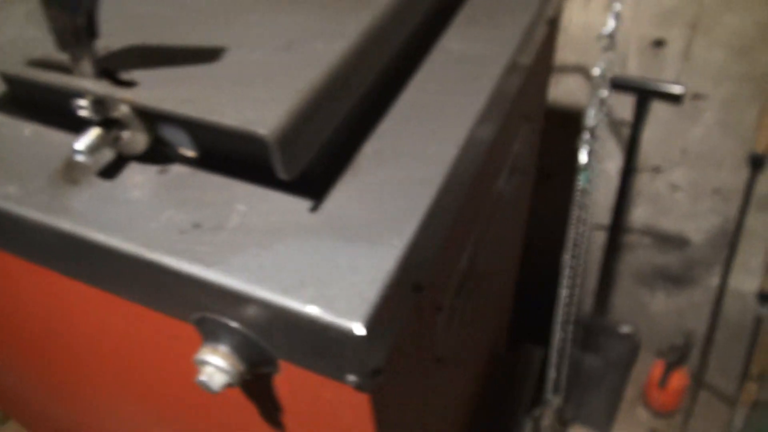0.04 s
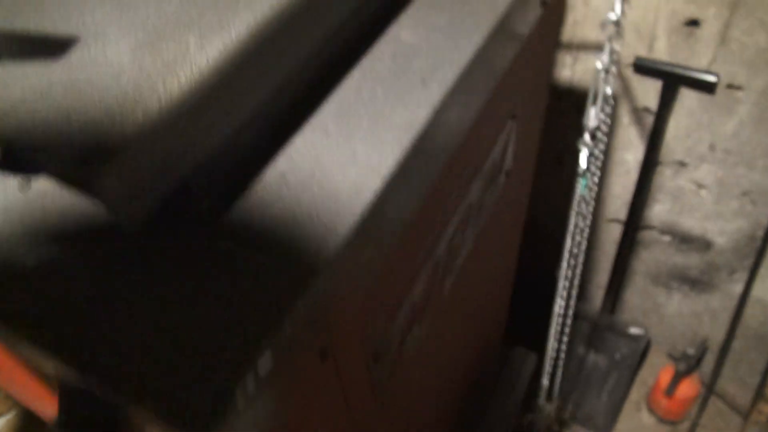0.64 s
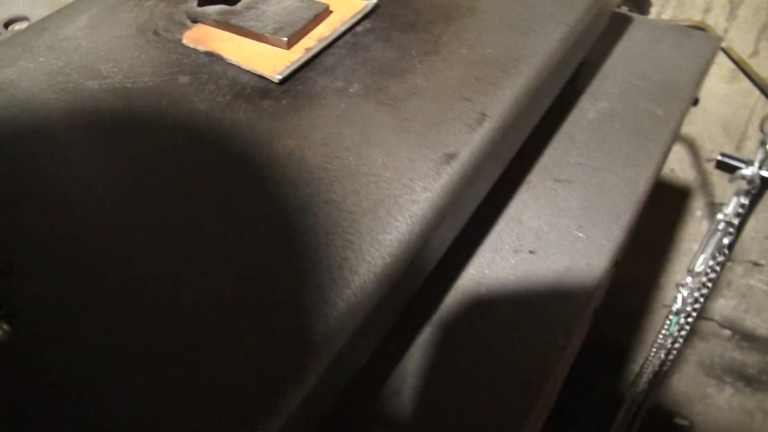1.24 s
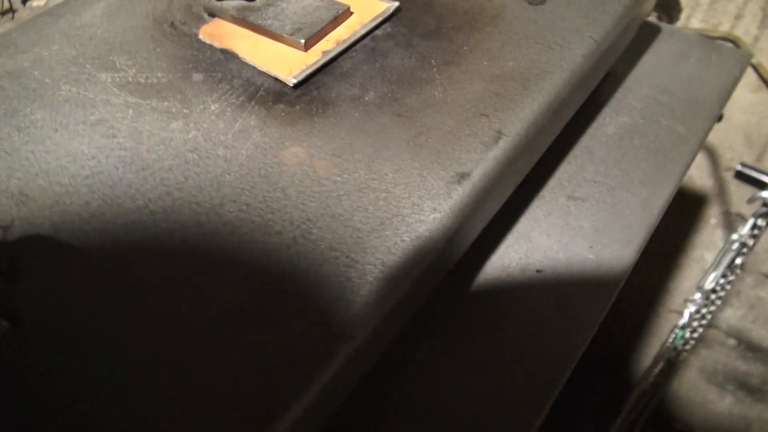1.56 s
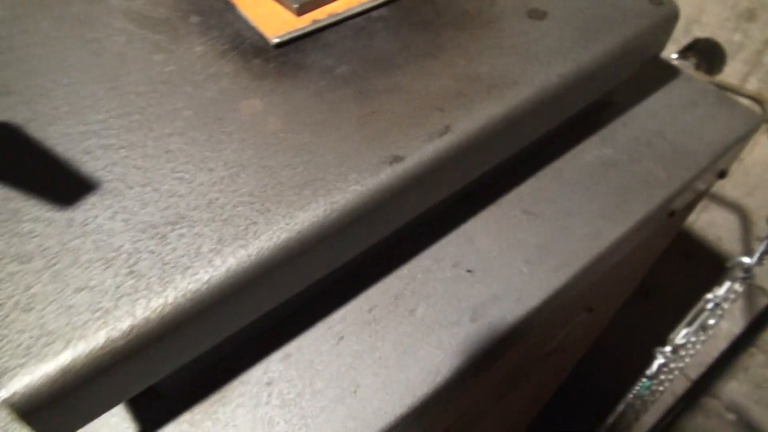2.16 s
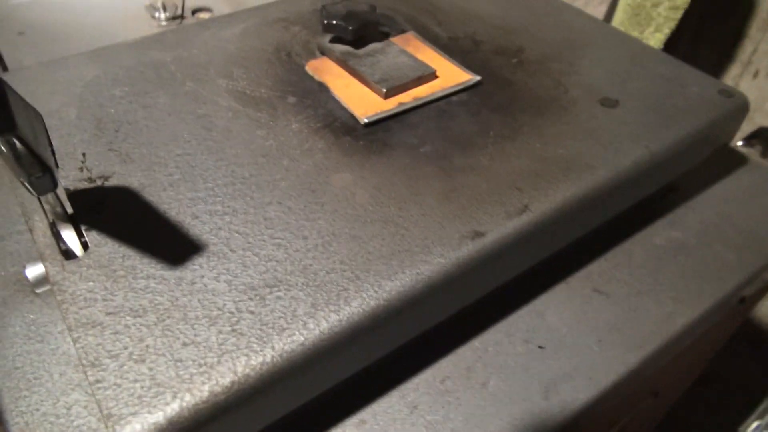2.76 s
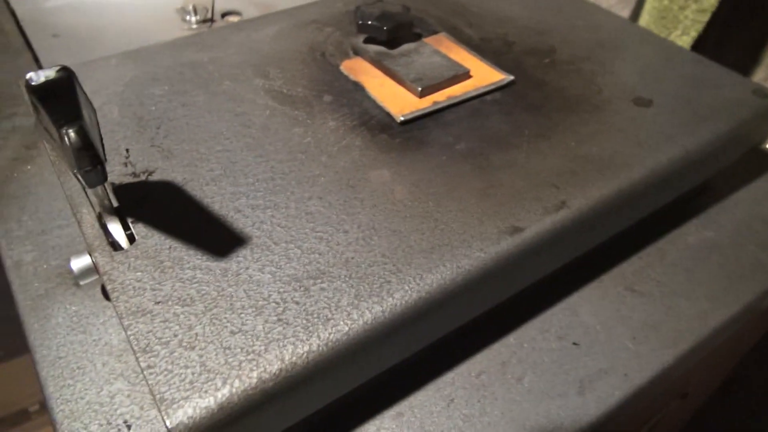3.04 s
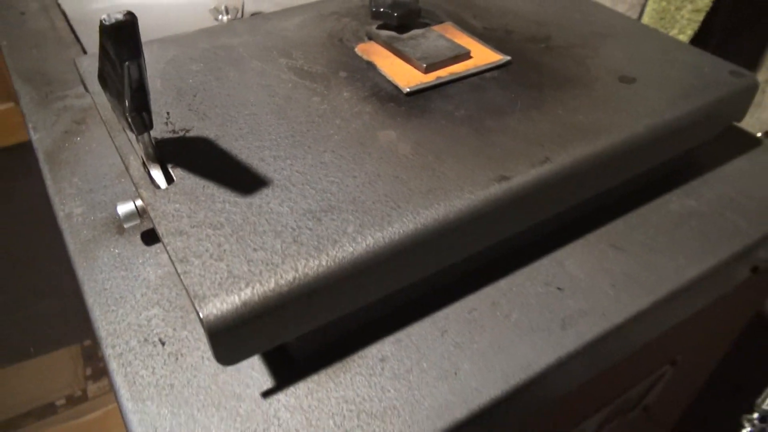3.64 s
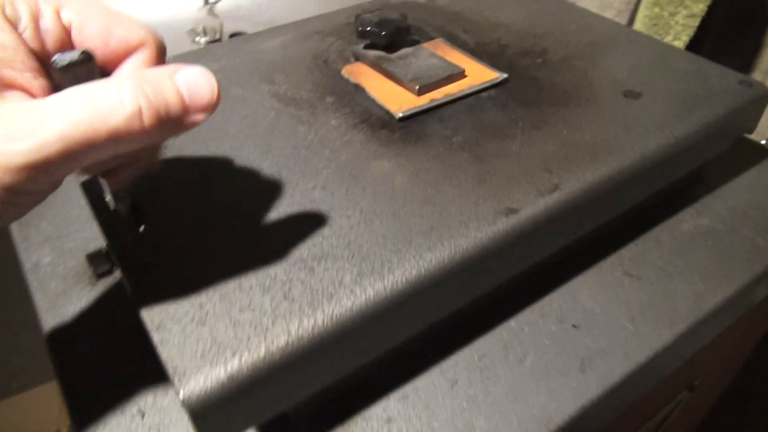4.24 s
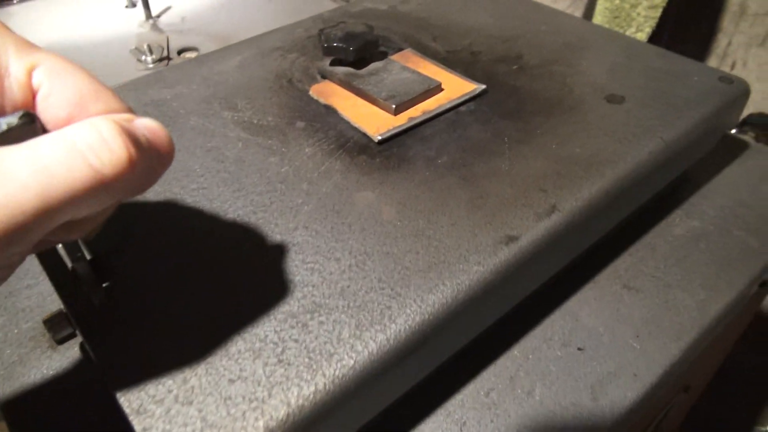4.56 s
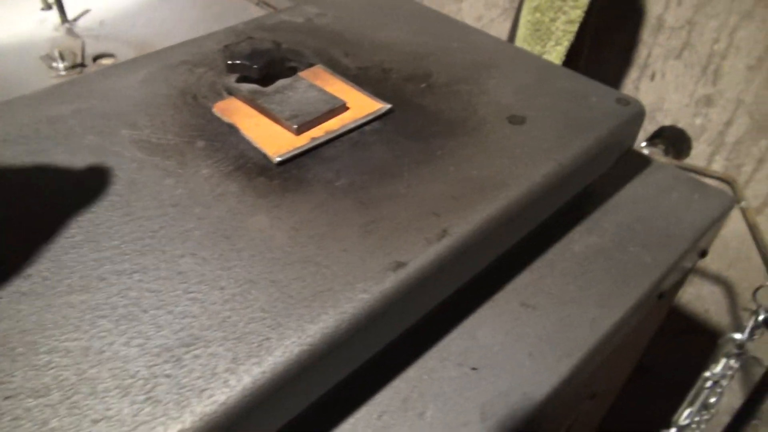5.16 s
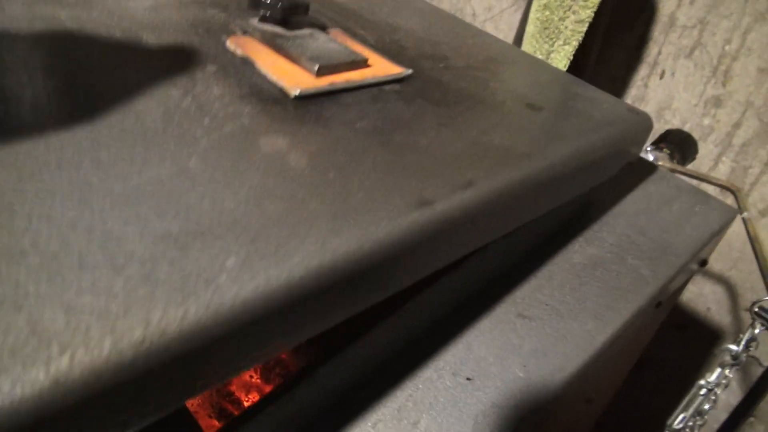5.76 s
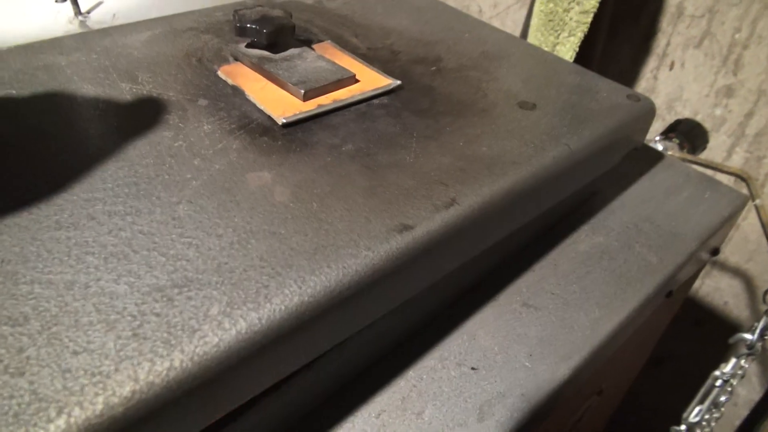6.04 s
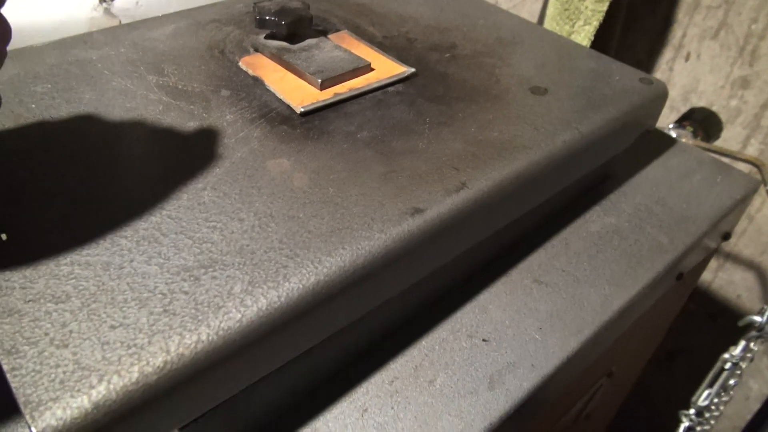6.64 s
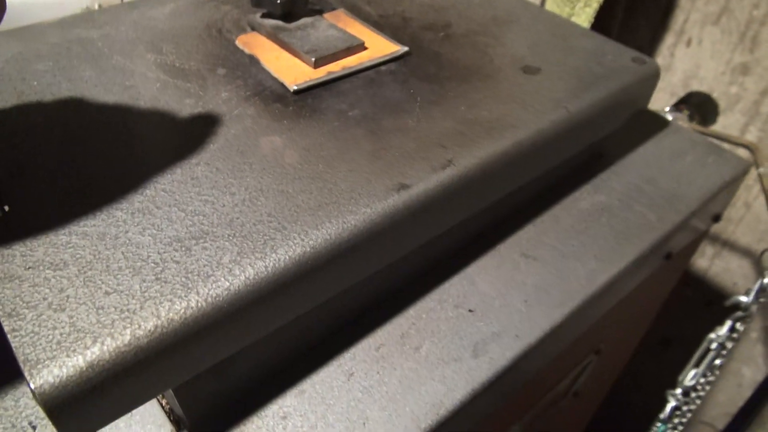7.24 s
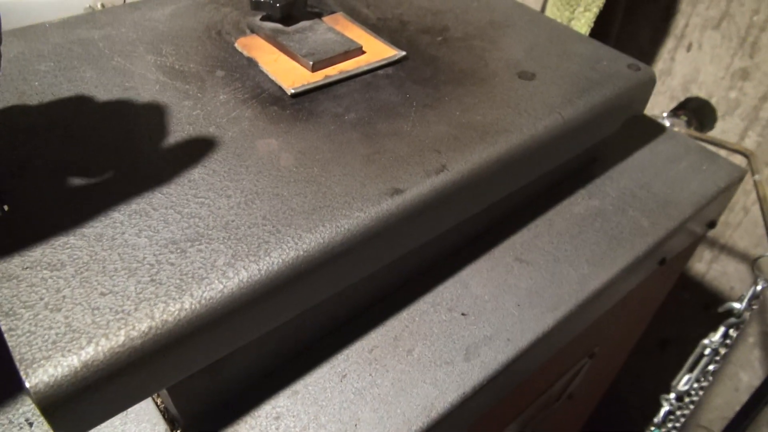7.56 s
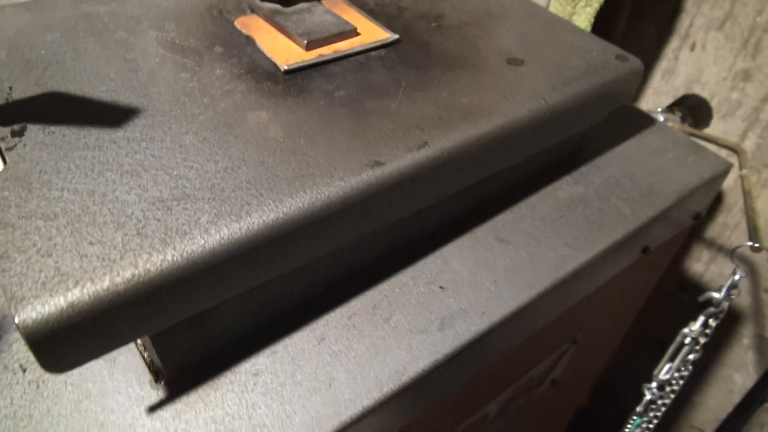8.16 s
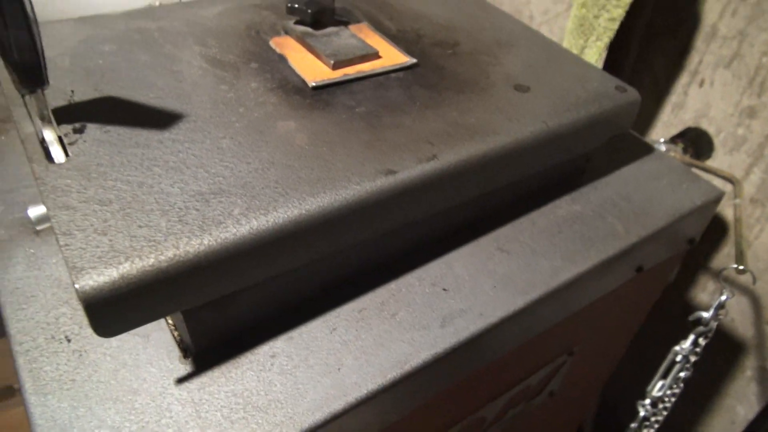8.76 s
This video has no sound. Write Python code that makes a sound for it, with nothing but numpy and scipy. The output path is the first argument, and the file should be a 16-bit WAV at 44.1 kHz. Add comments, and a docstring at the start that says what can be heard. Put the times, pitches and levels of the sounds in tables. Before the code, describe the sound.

Sleeves swish close by, then a steel boiler door's hinge squeals shrilly and the door slams with a ringing clang. The handle clacks and ticks, the latch snaps over, and the door opens with a rush of air and a few knocks. The fire rumbles louder in the flue as the door knocks on its stop and a chain tinkles faintly. A blower drones throughout, heard up close in stereo in a small hard room.

```python
"""Boiler door, close up

A stereo microphone near a steel boiler door in a small hard room. The hinge squeals, the door slams;
later the latch snaps over and the door is pulled open, knocks on its stop and sets a chain tinkling.
Sleeves swish close by. A blower drones behind it all, and the fire rumbles in the flue, louder
once the door is open."""
import sys
import numpy as np
from scipy import signal
from scipy.fft import rfft, irfft
from scipy.io import wavfile
from scipy.ndimage import uniform_filter1d, minimum_filter1d

SR = 44100
rng = np.random.default_rng(int(sys.argv[2]) if len(sys.argv) > 2 else 0)


def master(y):
    """Save y as 16-bit WAV."""
    cut = np.clip(np.atleast_2d(y).T, -1, 1)
    pcm = np.round(cut * 32767)  # scale
    wavfile.write(sys.argv[1], SR, pcm.astype(np.int16))


N = 392490
T = np.arange(N) / SR
OPEN_S, GUST_RISE_S = 5.545, 0.052  # the door opens and the draught builds
TOP_HZ = 15850

# The door hitting its frame, on shutting and as the latch lets go.
# Each row: start in seconds, level in dB, brightness in dB per octave, contact in seconds.
SLAMS = [(1.118, -16.5, 3, 0.0026), (1.129, -16, 0.25, 0.019), (4.984, -28.5, 0.5, 0.016)]
# Spectrum of small clicks and grit. Each row: frequency in Hz, level in dB.
CLICK_COLOUR = [(60, -47), (300, -17), (700, 2.5), (1500, 1), (2400, 1), (4000, -6), (6300, -6.5),
                (9000, -12.5), (15000, -21)]


def gain_of(db):
    """Decibels to amplitude."""
    return 10 ** (np.asarray(db) / 20)


def unit_rms(x):
    """Scales to rms 1."""
    return x / np.sqrt(np.mean(x ** 2) + 1e-20)


def curve_at(points, hz):
    """Reads a table along log frequency."""
    f, value = np.transpose(points)
    return np.interp(np.log(hz + 1), np.log(f + 1), value)


def add(mix, s, sound):
    """Mixes a sound into both channels at time s."""
    part = mix[:, max(round(s * SR), 0):][:, :sound.shape[1]]
    part += sound[:, :part.shape[1]]


def panned(db):
    """Channel gains that put the left db above the right."""
    return gain_of(np.array([[.5], [-.5]]) * db)


def swell(s, half):
    """A smooth rise and fall around time s."""
    return np.exp(-((T - s) / half) ** 2)


def wander(size, rate_hz):
    """Slow random motion of rms 1."""
    f = np.fft.rfftfreq(size, 1 / SR)
    return unit_rms(irfft(rfft(rng.standard_normal(size)) * np.exp(-(f / rate_hz) ** 2), size))


def noise(size, colour, tilt=0):
    """Coloured noise whose two channels agree in the bass and part in the treble."""
    # Likeness of the channels. Each row: frequency in Hz, correlation.
    likeness = [(100, 1), (1500, 0.91), (4000, 0.96), (7000, 0.38), (11000, 0.037)]
    hz = np.fft.rfftfreq(size, 1 / SR)
    left, other = rfft(rng.standard_normal((2, size)))
    same = curve_at(likeness, hz)
    right = same * left + np.sqrt(1 - same ** 2) * other
    shape = gain_of(curve_at(colour, hz) + tilt * np.log2(hz + 400))
    return unit_rms(irfft(np.array([left, right]) * shape, size))


def drone(hz, width_hz):
    """Noise ringing in one steep resonance."""
    f = np.fft.rfftfreq(N, 1 / SR)
    return unit_rms(irfft(rfft(rng.standard_normal(N)) / (1 + ((f - hz) / width_hz * 2) ** 2), N))


def ring_out(x):
    """Lets each band die away at its own speed."""
    # Decay of steel and room together. Each row: frequency in Hz, T60 in seconds.
    decay = [(80, 0.82), (170, 0.41), (700, 0.36), (1400, 0.26), (3000, 0.26), (6000, 0.23), (14000, 0.19)]
    hz, t, bands = signal.stft(x, SR, nperseg=256)
    fade = gain_of(-60 * t / curve_at(decay, hz)[:, None])
    return signal.istft(bands * fade, SR, nperseg=256)[1][:, :x.shape[1]]


def strikes(blows, colour, modes, modes_db, crack_db, tail_db, pan_db, bloom_share=.005):
    """Each blow on steel gives a crack during contact, a dying clatter and the part's clear modes."""
    out, t = np.zeros((2, N)), np.arange(SR) / SR
    offsets = rng.random(len(modes))  # quick blows feed the same swing of each mode
    beats_db = [2.5 * wander(SR, 26) for _ in modes]  # echoes make each ring swell and sink
    for s, db, tilt, contact in blows:
        burst = noise(SR, colour, tilt)
        crack = gain_of(crack_db) * burst * np.exp(-(t / contact) ** 2)
        sound = crack + gain_of(tail_db) * ring_out(burst)
        for (hz, mode_db, t60), offset, beat_db in zip(modes, offsets, beats_db):
            phase = 2 * np.pi * (hz * (t + s) + offset)
            bloom = 1 - np.exp(-(t / (bloom_share * t60)) ** 2)  # long rings build up more slowly
            bright_db = tilt * np.log2((hz + 400) / 1400)
            level = gain_of(modes_db + mode_db + bright_db + beat_db - 60 * t / t60)
            sound += bloom * level * np.sin(phase)
        attack = 1 - np.exp(-t / (0.21 * contact))
        add(out, s, gain_of(db) * sound * attack)
    return out * panned(pan_db)


def pings(touches, t60, rise_s=0.0011):
    """Each light touch rings one short mode."""
    out, t = np.zeros((2, N)), np.arange(SR // 4) / SR
    for s, hz, db in touches:
        level = gain_of(db - 60 * t / t60) * (1 - np.exp(-t / rise_s))
        add(out, s, level * np.sin(2 * np.pi * hz * t)[None])
    return out


def steel_tone(hz, lag_rad, db_per_octave, db_per_hz):
    """A tone with falling overtones that reaches the right channel a little late."""
    phase = 2 * np.pi * np.cumsum(hz) / SR - np.array([[0], [lag_rad]])
    return sum(gain_of(db_per_octave * np.log2(k) + db_per_hz * (k - 1) * hz.mean()) * np.cos(k * phase)
               for k in range(1, int(TOP_HZ / hz.mean()) + 1))


def blower(air_db=-53.5, waver_db=.4):
    """A steady rush of air, with the fan housing's hollow note off to the right."""
    # Blower and room air. Each row: frequency in Hz, level in dB.
    air_colour = [(25, -28.5), (45, -21), (70, 12.5), (105, -3), (170, 0.5), (300, 1), (500, -9.5),
                  (900, -11), (1300, -7), (1700, -18), (3000, -23.5), (6300, -28), (9000, -32.5),
                  (15000, -28.5)]
    # Housing resonances. Each row: centre in Hz, width in Hz, level in dB.
    resonances = [(676, 51, -56.5), (732, 100, -53), (1149, 62, -64.5)]
    # The note swelling and sinking. Each row: time in seconds, gain in dB.
    note_level = [(1.7, -1.5), (2.33, 3.5), (2.6, -1), (4.4, 0.5), (7.4, -1.5), (8.9, 1)]
    housing = sum(gain_of(db) * drone(hz, width) for hz, width, db in resonances)
    air = gain_of(air_db) * noise(N, air_colour)
    note_db = np.interp(T, *np.transpose(note_level)) + waver_db * wander(N, 5.2)
    return air + housing * gain_of(note_db) * panned(-6.5)


def flames(gust_db=-37, settled_db=-51, settle_s=1.22, flicker_db=1.1):
    """The fire roars up behind the opening door, then settles."""
    # Spectrum of the roar. Each row: frequency in Hz, level in dB.
    colour = [(25, -35), (50, -10), (100, -0.5), (135, 2.5), (170, 9.5), (200, -4.5), (270, -1), (350, 1.5),
              (410, -19), (480, -6), (600, -40), (1300, -39), (2000, -33.5), (6000, -44.5), (10000, -55.5)]
    since = np.maximum(T - OPEN_S, 0)
    rise = np.minimum(since / GUST_RISE_S, 1)
    roar_db = settled_db + (gust_db - settled_db) * np.exp(-since / settle_s)
    return noise(N, colour) * rise * gain_of(roar_db + flicker_db * wander(N, 30))


def flue(shut_db=-59.5, open_db=-42.5, settle_db_per_s=-2, delay_s=0.31):
    """The flue booms at its own pitch, surging hardest once the door is open."""
    # Surges of the boom. Each row: peak time and half length in seconds, level in dB.
    surges = [(2.8, .11, -48.5), (5.91, 0.045, -35), (6.643, 0.12, -35.5), (7.024, 0.1, -34),
              (8.196, 0.044, -45), (8.522, 0.061, -42)]
    boom = signal.hilbert(drone(hz=73.7, width_hz=13))
    boom = unit_rms((boom / (abs(boom) + 0.46)).real)  # the flames keep its strength fairly even
    since = np.maximum(T - OPEN_S, 0)
    draught = np.clip((since - delay_s) / GUST_RISE_S, 0, 1) * gain_of(open_db + settle_db_per_s * since)
    surging = sum(gain_of(db) * swell(s, half) for s, half, db in surges)
    return boom * (gain_of(shut_db) + draught + surging)


def embers(per_s=12, level_db=-61, decay_s=.002):
    """Embers snap faintly at random once the door is open."""
    snaps = (rng.random(N) < per_s / SR) * (T > OPEN_S) * np.minimum(rng.exponential(1, N), 2)
    bursts = signal.lfilter([1], [1, -np.exp(-1 / (decay_s * SR))], snaps + 1e-12)
    return gain_of(level_db) * bursts * noise(N, CLICK_COLOUR, tilt=3)


def gap_draught(flutter_db=2):
    """Air is sucked in under the edge of the door until the gap is wide."""
    # Resonances of the gap. Each row: centre in Hz, width in Hz, level in dB.
    resonances = [(206, 47, -40.5), (318, 69, -40), (460, 52, -48.5), (930, 180, -55.5)]
    rush = sum(gain_of(db) * drone(hz, width) for hz, width, db in resonances)
    opening = np.clip((T - OPEN_S) / GUST_RISE_S, 0, 1)
    return rush * swell(5.71, half=0.15) * opening * gain_of(flutter_db * wander(N, 25))


def sleeves(rise_share=0.57, grain_db=1.5, trail_db=-13, trail_lag_s=0.025):
    """Cloth brushes cloth by the microphone; loose folds rustle on, softer and duller."""
    # Swishes. Each row: peak time and half length in seconds, level in dB, brightness in dB per octave.
    swishes = [(0.176, 0.051, -40.5, -2.5), (0.355, 0.051, -38.5, -0.5), (0.467, 0.074, -41.5, -4.5),
               (0.569, 0.077, -52.5, -4.5), (1.789, 0.089, -53, -6), (2.052, 0.071, -56, -3),
               (2.204, 0.089, -50, -1), (2.423, 0.07, -43, 0), (2.536, 0.031, -49.5, -3.5),
               (3.724, 0.058, -57, -2), (3.96, 0.042, -44.5, -1.5), (4.132, 0.069, -54.5, -2.5),
               (5.553, 0.076, -42.5, -5)]
    # Spectrum of rubbing cloth. Each row: frequency in Hz, level in dB.
    cloth = [(50, -30), (200, -6), (500, -4.5), (1100, 1.5), (2000, -2), (4500, -7.5), (6200, -3),
             (8500, -11), (13000, -9), (16000, -8.5)]
    out, t = np.zeros((2, N)), np.arange(SR) / SR
    for s, half, db, tilt in swishes:
        start = max(s - t[-1] / 2, 0)
        since = t + start - s
        width = half * np.where(since < 0, rise_share, 1)  # comes faster than it goes
        brush = noise(SR, cloth, tilt) * np.exp(-(since / width) ** 2)
        trail = noise(SR, cloth, tilt - 0.5) * np.exp(-((since - trail_lag_s) / (2.7 * width)) ** 2)
        trail *= gain_of(trail_db) * np.clip(1 + since / width, 0, 1)
        add(out, start, (brush + trail) * gain_of(db + grain_db * wander(SR, 590)))
    return out


def rasps(grain_db=3.5):
    """Skin and cloth catch on rough steel in tiny grains, heard through one broad resonance."""
    # Dry strokes. Each row: peak time and half length in seconds, level in dB.
    strokes = [(0.195, 0.038, -51.5), (.555, 0.054, -56.5), (0.73, 0.032, -54.5), (2.452, 0.03, -45.5),
               (4.16, 0.051, -53), (4.39, 0.035, -60.5), (4.481, 0.034, -55.5)]
    level = sum(gain_of(db) * swell(s, half) for s, half, db in strokes)
    return level * unit_rms(drone(hz=2470, width_hz=3000) * gain_of(grain_db * wander(N, 300)))


def body_groans(waver=0.0445):
    """The steel body groans in soft, unsteady low tones."""
    # Groans. Each row: peak time and half length in seconds, pitch in Hz, level in dB.
    groans = [(0.056, 0.18, 177.7, -50), (4.582, 0.068, 237.6, -52.5), (8.446, 0.055, 251, -37),
              (8.622, 0.078, 239.7, -45)]
    wavering_time = np.cumsum(1 + waver * wander(N, 30.3)) / SR
    return sum(gain_of(db - 5.2 * ((T - s) / half) ** 2) * np.sin(2 * np.pi * hz * wavering_time)
               for s, half, hz, db in groans)


def chain():
    """Links touch faintly as the door is lowered."""
    # Clinks. Each row: start in seconds, pitch in Hz, level in dB.
    links = [(7.781, 4560, -57), (7.859, 5680, -53), (7.917, 4270, -53), (8.022, 4440, -58.5)]
    return pings(links, t60=.02)


def tocks():
    """Hollow tocks as the door settles and the handle is touched."""
    # Touches. Each row: start in seconds, pitch in Hz, level in dB.
    touches = [(.462, 953, -30), (1.8925, 725, -27.5), (5.291, 773, -38)]
    return pings(touches, t60=0.054)


def handle(contact_s=0.0028):
    """The handle ticks and clacks in brief contacts with no clear note."""
    # Ticks. Each row: start in seconds, level in dB, brightness in dB per octave.
    ticks = [(.685, -49.5, 3.5), (1.886, -29.5, -6), (1.893, -37, -4.5), (1.9132, -31.5, -6),
             (4.103, -48, -1), (4.121, -45, 0), (4.502, -42.5, -5.5), (4.548, -44, -0.5),
             (4.6507, -40.5, -1.5), (4.7624, -37, -5), (4.889, -42.5, 0), (4.956, -37.5, -1),
             (5.5076, -39, 6.5), (8.135, -51, 11.5)]
    blows = [(*tick, contact_s) for tick in ticks]
    return strikes(blows, CLICK_COLOUR, [], modes_db=0, crack_db=-0.5, tail_db=-15, pan_db=1.5)


def hinge_scrape(uneven_db=3):
    """The hinge rubs faintly and unevenly while the door is lifted."""
    # Hinge resonances. Each row: centre in Hz, width in Hz, level in dB.
    resonances = [(1630, 140, -68), (2750, 700, -70), (5500, 900, -72)]
    rub = sum(gain_of(db) * drone(hz, width) for hz, width, db in resonances)
    return rub * swell(6.33, half=0.11) * gain_of(uneven_db * wander(N, 19))


def hinge_pin():
    """The pin clanks as it takes the weight of the door."""
    # The clank, with columns as in SLAMS.
    blows = [(5.7352, -35, -3.5, 0.005)]
    # Pin modes. Each row: frequency in Hz, level in dB, T60 in seconds.
    modes = [(985, -1, 0.1), (1685, -8, 0.07), (2546, -1, 0.046), (3289, -12, 0.098), (3903, -12, 0.06)]
    return strikes(blows, CLICK_COLOUR, modes, modes_db=2, crack_db=-4.5, tail_db=-14.5, pan_db=0)


def door_knocks():
    """The open door knocks on its hinge and stop, ringing the firebox."""
    # Knocks, with columns as in SLAMS.
    blows = [(5.527, -39, 6, 0.022), (5.597, -38, -2, 0.0063), (5.738, -33, -4, 0.011),
             (6.9398, -28.5, 5.5, 0.0037), (6.9435, -23, -3, 0.017)]
    # Spectrum of a knock. Each row: frequency in Hz, level in dB.
    colour = [(30, -31), (70, -6.5), (110, -9), (180, 1.5), (350, -3), (450, -16.5), (780, -8.5),
              (1200, -17.5), (1650, -14.5), (2150, -26), (2750, -23.5), (4500, -37.5), (6400, -32.5),
              (8000, -49.5), (15000, -57.5)]
    # Firebox modes. Each row: frequency in Hz, level in dB, T60 in seconds.
    modes = [(77.2, -15.5, 0.66), (165.7, -3, 0.2), (360, 0.5, 0.3), (785, -12, 0.22), (990, -13, 0.19),
             (1597, -13, 0.19), (1700, -17, 0.26), (2710, -20, 0.13)]
    return strikes(blows, colour, modes, modes_db=-0.6, crack_db=3.5, tail_db=-2.5, pan_db=-1)


def latch():
    """The latch drags over its catch and snaps home, ringing the lever."""
    # Latch blows, with columns as in SLAMS.
    blows = [(4.993, -27.5, -12, 0.024), (5.0098, -26.5, 1, 0.0037), (5.0328, -21, 3.5, 0.0046)]
    # Spectrum of the snap. Each row: frequency in Hz, level in dB.
    colour = [(40, -78.5), (120, -45.5), (230, -26.5), (340, -12), (500, -21), (700, -16), (1250, -9.5),
              (1650, 0), (1900, -8), (2200, -7.5), (2700, -19.5), (7000, -30), (9500, -38), (13300, -35),
              (15500, -46.5)]
    # Lever modes. Each row: frequency in Hz, level in dB, T60 in seconds.
    modes = [(356, -9, 0.13), (1548, -9, 0.196), (1690, 19, 0.029), (1648, 1.5, 0.17), (2196, -10, 0.15)]
    return strikes(blows, colour, modes, modes_db=11.5, crack_db=5, tail_db=-2, pan_db=1, bloom_share=.24)


def plate_shiver(level_db=-57, t60=2.8):
    """After the slam the plate shivers in its frame, a fuzzy band near its longest ring."""
    since = T - SLAMS[0][0]
    return drone(hz=2150, width_hz=480) * (since > 0) * gain_of(level_db - 60 * abs(since) / t60)


def door_slam():
    """The door hits its frame and the steel plate rings."""
    # Spectrum of the impact. Each row: frequency in Hz, level in dB.
    colour = [(30, -60.5), (90, -28), (140, -9), (400, -6.5), (560, -14), (800, -6.5), (1400, -10.5),
              (2300, -10), (2700, -17.5), (3600, -19.5), (4600, -31), (6600, -27.5), (8000, -40.5),
              (15000, -52)]
    # Plate modes. Each row: frequency in Hz, level in dB, T60 in seconds.
    modes = [(409, -15, .45), (781, 4, 0.31), (877, -11, 0.28), (982, -3, .17), (1069, -2.5, 0.15),
             (1266, -5, 0.17), (1352, -5, 0.2), (1480, -9, 0.26), (1650, -3.5, 0.23), (1949, -7, .18),
             (2067, -11, .23), (2240, 0.5, 0.24), (3023, -19.5, 0.25), (3558, -13, 0.22), (6475, -35, .28),
             (2250, -36, 2.4)]
    return strikes(SLAMS, colour, modes, modes_db=-4, crack_db=-10.5, tail_db=0.5, pan_db=1)


def hinge_slips(jitter=.017, stumble=.012, flutter_hz=365, grit=.55, grind_db=-20, fade_s=0.0029):
    """Steel slips and grinds on steel, stumbling in pitch, rougher the harder it is pressed."""
    # Two slips, a curve for each. Each row: time in seconds, pitch in Hz, relative level in dB.
    slips = [
        [(0.862, 2480, -44), (0.875, 2510, -38), (0.903, 2535, -31), (0.926, 2365, -32), (0.963, 2350, -28),
         (0.984, 2350, -39), (1.02, 2370, -42.5)],
        [(1.015, 1850, -45), (1.047, 1860, -32.5), (1.066, 1875, -30), (1.085, 1965, -31.5), (1.118, 2040, -29)],
    ]
    out = np.zeros((2, N))
    for curve in slips:
        times, pitches, levels = np.transpose(curve)
        t = np.arange(times[0], times[-1], 1 / SR)
        db = np.interp(t, times, levels)
        rough = np.clip((db + 44) * 0.05, 0, 1)  # sets in above -44 dB
        wobble = jitter * wander(len(t), 400) + stumble * wander(len(t), 90)
        hz = np.interp(t, times, pitches) * (1 + rough * wobble)
        flutter = .3 * np.sin(2 * np.pi * flutter_hz * t)  # sidebands from the door's low mode
        shake = unit_rms(1 + rough * (flutter + grit * wander(len(t), 250)))
        fade = np.minimum(np.minimum(t - t[0], t[-1] - t) / fade_s, 1)
        tone = steel_tone(hz, lag_rad=.22, db_per_octave=-6, db_per_hz=-.0013)
        grind = gain_of(grind_db) * rough * noise(len(t), CLICK_COLOUR, tilt=1.5)
        add(out, times[0], gain_of(db + 3) * fade * shake * (tone + grind))
    return out * panned(1.5)


def hinge_shrieks(rise_s=.021, t60=.11, jitter=.0028):
    """One high steel mode after another builds while the slipping drives it, then rings out."""
    # Shrieks. Each row: start and length in seconds, pitch in Hz, level in dB, right lag in radians.
    shrieks = [(.895, .038, 6860, -17.5, 2.4), (.905, .045, 6500, -33, 1.3), (.94, .13, 6860, -35, 2.4),
               (.943, .039, 7195, -11.5, 2.3), (.984, .028, 7250, -15, 1.5), (1.028, .028, 7245, -27, 1.3),
               (1.066, .048, 6477, -15.5, 1.3)]
    out, t = np.zeros((2, N)), np.arange(SR // 3) / SR
    for s, length, hz, db, lag in shrieks:
        level = np.minimum(t / rise_s, 1) ** 2 * gain_of(db - 60 * np.maximum(t - length, 0) / t60)
        pitch = hz * (1 + jitter * wander(len(t), 391))
        add(out, s, level * steel_tone(pitch, lag, db_per_octave=-5.5, db_per_hz=-.0019))
    return out * panned(2.5)


def hinge_squeal(mingle_db=24, slip_room_db=-5, shriek_room_db=-11):
    """Slips and shrieks share one contact, make sum and difference tones and echo in the room."""
    slips, shrieks = hinge_slips(), hinge_shrieks()
    slips *= 1 + gain_of(mingle_db) * shrieks ** 2
    room = ring_out(rng.standard_normal((2, SR // 2)))
    into_room = gain_of(slip_room_db) * slips + gain_of(shriek_room_db) * shrieks
    echoes = signal.oaconvolve(into_room, room / np.linalg.norm(room[0]), axes=1)[:, :N]
    return slips + shrieks + echoes


def scene():
    """The door, its latch and the person at it, over blower and fire."""
    impacts = door_slam() + latch() + door_knocks() + handle() + hinge_pin() + tocks() + chain()
    door = impacts + plate_shiver() + hinge_squeal() + hinge_scrape() + body_groans()
    return door + sleeves() + rasps() + blower() + gap_draught() + flames() + flue() + embers()


def record(dry, low_cut_hz=42, ceiling=.8):
    """The microphone favours the left; deep rumble is cut, peaks are limited, the top is rolled off."""
    # Channel balance. Each row: frequency in Hz, left over right in dB.
    balance = [(60, 2.5), (150, 3), (400, 2), (700, 0), (2300, 2.5), (4400, .5), (12000, 2)]
    hz = np.fft.rfftfreq(N, 1 / SR)
    low_cut = hz ** 4 / (hz ** 4 + low_cut_hz ** 4)
    heard = irfft(rfft(dry) * panned(curve_at(balance, hz)) * low_cut, N)
    duck = minimum_filter1d(ceiling / np.maximum(abs(heard).max(0), ceiling), size=301)
    limited = heard * uniform_filter1d(duck, size=301)
    low_pass = signal.firwin(511, TOP_HZ, window=("kaiser", 9), fs=SR)
    return signal.oaconvolve(limited, low_pass[None], "same")


dry = scene()
out = record(dry)
master(out)
```